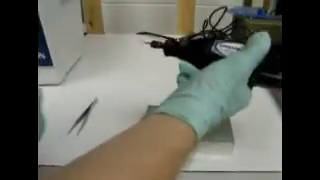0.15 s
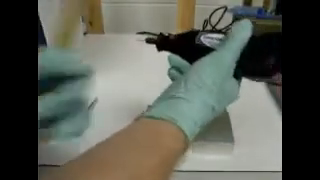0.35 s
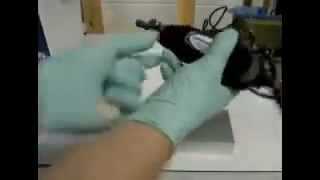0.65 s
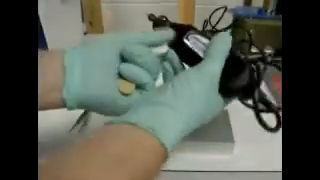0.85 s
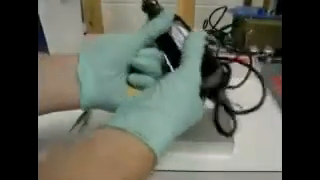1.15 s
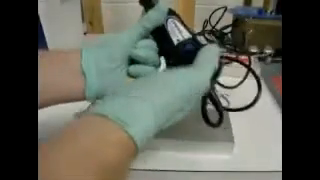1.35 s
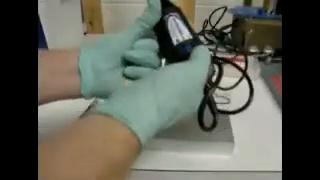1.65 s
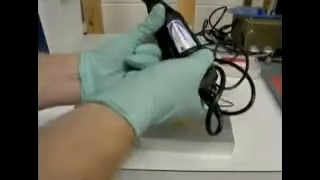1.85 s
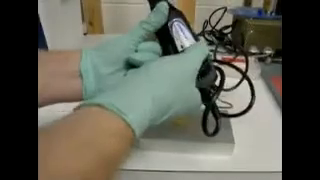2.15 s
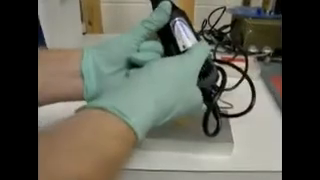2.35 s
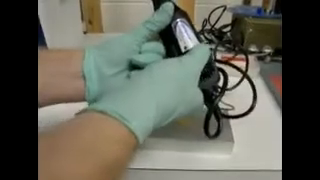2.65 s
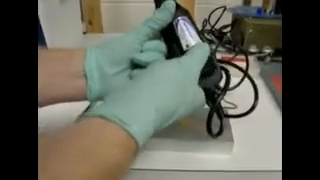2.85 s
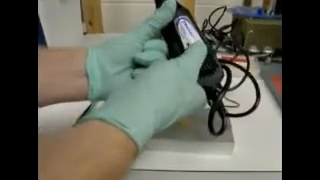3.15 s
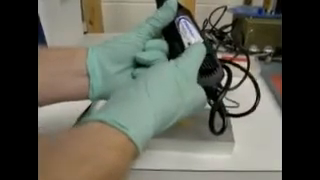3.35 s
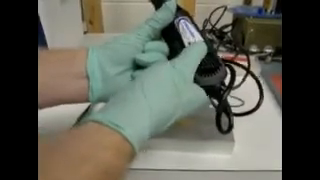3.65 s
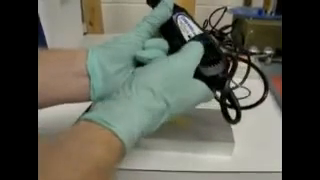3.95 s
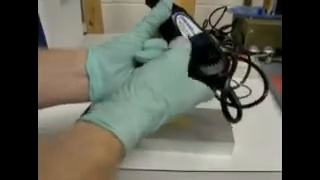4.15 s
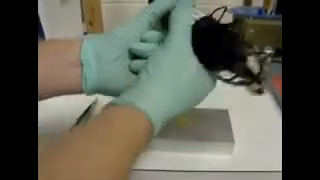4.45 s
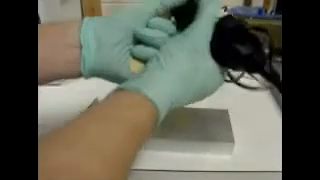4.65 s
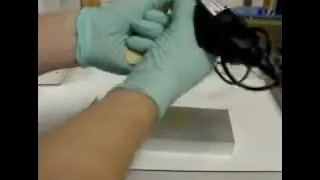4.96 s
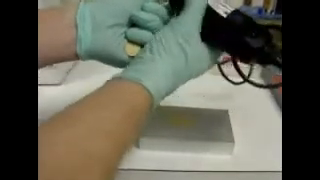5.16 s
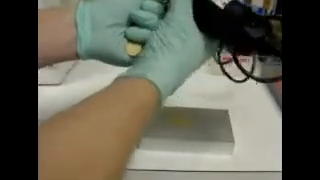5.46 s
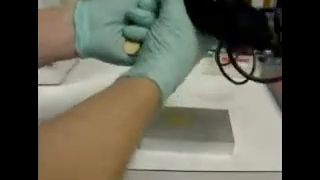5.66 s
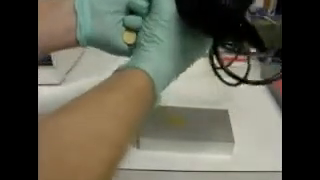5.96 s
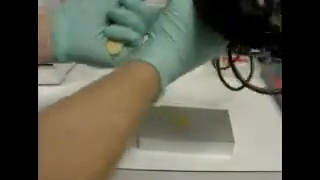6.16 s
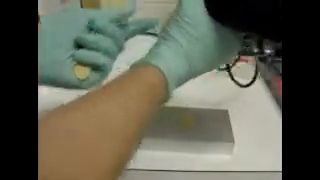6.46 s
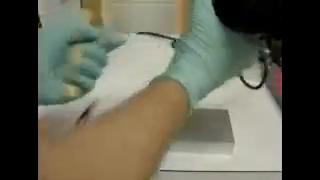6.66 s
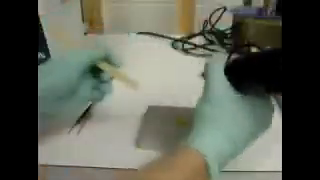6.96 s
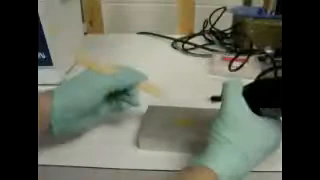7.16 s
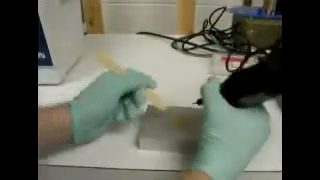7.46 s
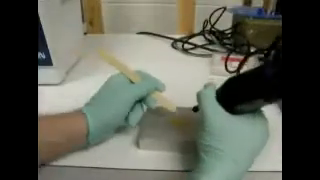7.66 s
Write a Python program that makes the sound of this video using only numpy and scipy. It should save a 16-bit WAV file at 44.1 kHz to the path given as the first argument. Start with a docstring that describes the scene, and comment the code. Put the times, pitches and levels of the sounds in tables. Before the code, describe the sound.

In a lab with low ventilation rumble and electrical hum, rubber gloves rub and click on the plastic body of a small rotary tool. A switch snaps and the motor starts with a low, buzzing growl. It is quickly turned up to a high whine with rushing air and hiss, running freely and shifting slightly in tone as it is handled. The microphone is close.

```python
"""A lab, over ventilation rumble and mains hum. Gloved hands shift their grip on a small rotary tool:
rubber sticks and slips, plastic clicks, and the switch snaps on. The motor growls at low speed,
pulsing with the mains, then is turned up to a high whine of armature slots and fan blades over
rushing air and hissing brushes. A small camera's low sampling rate folds the highest whistle down."""
import sys
import numpy as np
from scipy import signal
from scipy.fft import rfft, irfft, next_fast_len
from scipy.io import wavfile
from scipy.ndimage import uniform_filter1d, map_coordinates

SR = 44100
rng = np.random.default_rng(int(sys.argv[2]) if len(sys.argv) > 2 else 0)


def store_pcm(level_fs):
    """Save levels as 16-bit WAV."""
    pcm = np.round(np.clip(level_fs, -1, 1) * 32767).astype(np.int16)
    wavfile.write(sys.argv[1], SR, np.atleast_2d(pcm).T)


N = 343980
T = np.arange(N) / SR
MAINS_HZ = 60
SWITCH_S, TURN_UP_S = 2.54, 3.0545  # power on; speed control turned up

# running noise as the hands cover and uncover the tool: (time [s], air level [dB], hiss level [dB])
HAND_COVER = [(3.6, -60, -53), (3.67, -58.5, -53.5), (4.11, -56.5, -51.5), (4.46, -51, -48),
              (4.48, -55.5, -51.5), (4.66, -51, -49.5), (4.77, -53.5, -53.5), (4.84, -50, -51.5),
              (4.97, -53.5, -50.5), (5.44, -55, -48), (5.74, -55.5, -51), (5.94, -62.5, -55.5),
              (6.02, -57, -50.5), (6.24, -54, -50), (6.43, -57.5, -54.5), (7.1, -53.5, -49.5),
              (7.31, -56.5, -54.5), (7.53, -50.5, -47.5), (7.63, -55.5, -54), (7.78, -54.5, -50)]
# modes of the plastic shell: (frequency [Hz], width [Hz], level [dB])
SHELL_MODES = [(2528, 323, -1.5), (3460, 147, -2.5), (4640, 410, -4.5), (6270, 270, -4.5)]
# the nose of the tool tips down: (time [s], tilt [0-1])
NOSE_TILT = [(7.25, 0), (7.5, 1)]


def amp(db):
    """Decibels to gain."""
    return 10 ** (np.asarray(db) / 20)


def unit(x):
    """Scale to rms 1."""
    return x / np.sqrt(np.mean(x ** 2) + 1e-20)


def eq(points, hz):
    """Gain of an EQ curve drawn through (frequency [Hz], level [dB]) points on a log axis."""
    freqs, db = np.transpose(points)
    return amp(np.interp(np.log(hz + 1), np.log(freqs + 1), db))


def curves(rows):
    """Automation: one value per sample for each column after the time."""
    times, *columns = np.transpose(rows)
    return [np.interp(T, times, column) for column in columns]


def wobble(rate):
    """A smooth random curve, rate knots a second."""
    return map_coordinates(rng.standard_normal(int(N * rate / SR) + 4), [T * rate])


def filtered(x, response):
    """Pass x through a complex response of frequency."""
    size = next_fast_len(N + 8192)
    return irfft(rfft(x, size) * response(np.fft.rfftfreq(size, 1 / SR)), size)[:N]


def noise(spectrum, patchy_db):
    """Coloured noise of rms 1 with drifting patches of gain."""
    bins = signal.stft(rng.standard_normal(N), nperseg=512)[2]
    patches = uniform_filter1d(rng.standard_normal(bins.shape), size=5, axis=0)
    patches = unit(uniform_filter1d(patches, size=36, axis=1))
    patchy = signal.istft(bins * amp(patchy_db * patches), nperseg=512)[1][:N]
    return unit(filtered(patchy, lambda hz: eq(spectrum, hz)))


def causal(x, spectrum, size=2048):
    """Colour x with a minimum-phase filter of energy 1, keeping attacks sharp."""
    cepstrum = irfft(np.log(eq(spectrum, np.fft.rfftfreq(size, 1 / SR))))
    cepstrum[1:size // 2] *= 2
    cepstrum[size // 2 + 1:] = 0
    response = irfft(np.exp(rfft(cepstrum)))
    return signal.fftconvolve(x, response / np.linalg.norm(response))[:N]


def resonances(modes, hz):
    """Complex response of modes of alternating polarity."""
    return sum((-1) ** k * amp(db) * 1j * hz * width / (centre ** 2 - hz ** 2 + 1j * hz * width)
               for k, (centre, width, db) in enumerate(modes))


def room_tone():
    """Ventilation rumble and mains hum; the bed sinks as the tool comes up to speed."""
    # ventilation colour: (frequency [Hz], level [dB])
    rumble_eq = [(13, -43.5), (22, -0.5), (54, 1), (150, -10), (188, -6), (333, -13.5), (387, -11),
                 (621, -20.5), (837, -15.5), (1050, -21.5), (1190, -23.5), (2000, -24), (2160, -27.5),
                 (5560, -31), (8500, -40.5), (11000, -87.5), (18700, -120)]
    # fader of the bed: (time [s], level [dB])
    fader = [(0, -62.5), (0.5, -65), (3.05, -63.5), (3.4, -71.5), (7.8, -75)]
    rumble = unit(filtered(rng.standard_normal(N), lambda hz: eq(rumble_eq, hz)))
    phase = 2 * np.pi * MAINS_HZ * T
    hum = np.sqrt(2) * (amp(-17) * np.sin(phase) + amp(-10.5) * np.sin(2 * phase))
    return amp(curves(fader)[0]) * (rumble + hum * amp(0.78 * wobble(3.3)))


def gloves():
    """Rubber sticks and slips in tiny grains; each stroke of the grip swells and fades."""
    # slides on the shell: (middle [s], half length [s], rub level [dB], hiss level [dB])
    strokes = [(.245, 0.1, -64, -63.5), (0.404, 0.079, -70, -68.5), (0.496, 0.054, -62.5, -62.5),
               (0.666, 0.093, -70, -66), (0.873, 0.072, -72.5, -67.5), (0.932, 0.029, -61, -64),
               (1.052, 0.13, -67.5, -64.5), (1.315, 0.12, -72.5, -73), (1.592, 0.082, -66.5, -72.5),
               (1.82, 0.071, -74, -73)]
    # broad body of the rub: (frequency [Hz], level [dB])
    rub_eq = [(500, -25), (1500, -12.5), (3000, -8), (4600, -5), (5500, -4.5), (7500, -22)]
    # bright hiss of the slide: (frequency [Hz], level [dB])
    slide_eq = [(3500, -34), (5200, -2.5), (6800, 5.5), (7800, -1), (9000, -20), (12000, -51)]
    rub, hiss = np.zeros(N), np.zeros(N)
    for middle, half, rub_db, hiss_db in strokes:
        swell = np.exp(-((T - middle) / half) ** 2)
        rub = np.hypot(rub, amp(rub_db) * swell)
        hiss = np.hypot(hiss, amp(hiss_db) * swell)
    grain = unit(amp(1.1 * wobble(450) + 1.6 * wobble(49.7)))
    return grain * (rub * noise(rub_eq, patchy_db=1.5) + hiss * noise(slide_eq, patchy_db=1.8))


def clicks():
    """Each click is a sharp snap, a faint knock and a short ring of the struck part of the shell."""
    # grip, switch and speed control: (time [s], level [dB], ring offset [dB], ring pitch [Hz])
    hits = [(0.2205, -33, -26, 2400), (0.2596, -28.5, -17, 2400), (0.262, -32, -18, 2430),
            (0.2649, -30, -1.5, 2400), (0.9338, -50.5, 2, 1630), (1.3494, -46, -10, 2400),
            (2.531, -24.5, -11, 3280), (2.5362, -38, -10, 3360), (3.0763, -28, -19, 3380),
            (5.4467, -29, -24, 2400)]
    # bright plastic snap: (frequency [Hz], level [dB])
    snap_eq = [(500, -30), (2000, -24), (3300, -13), (4300, -13.5), (5400, -8), (6000, -5), (6900, -2),
               (8000, -18), (10000, -6.5)]
    # midrange knock: (frequency [Hz], level [dB])
    knock_eq = [(100, -18), (600, -25), (1200, -2.5), (1800, -3), (3000, -11), (6000, -13)]
    snaps, rings = np.zeros(N), np.zeros(N)
    t = np.arange(SR // 10) / SR
    attack = 1 - np.exp(-t / 0.00032)
    strike = attack * (amp(-60 * t / 0.0061) + amp(-23) * amp(-60 * t / 0.069))
    ring = attack * amp(-60 * t / 0.008)
    for time, db, ring_db, hz in hits:
        start = round(time * SR)
        snaps[start:start + len(t)] += amp(db + 6) * strike * rng.standard_normal(len(t))
        rings[start:start + len(t)] += amp(db + ring_db + 3) * ring * np.sin(2 * np.pi * hz * t)
    low_cut = signal.butter(2, 1500, 'highpass', fs=SR, output='sos')
    return causal(snaps, snap_eq) + amp(-23) * causal(snaps, knock_eq) + signal.sosfilt(low_cut, rings)


def walls(x, t60):
    """The short diffuse answer of bench and walls."""
    t = np.arange(SR // 3) / SR
    tail = rng.standard_normal(len(t)) * amp(-60 * t / t60) * (t > .003)
    return signal.fftconvolve(x, tail / np.linalg.norm(tail))[:N]


def shaft_speed():
    """Turns a second: a slow start, a leap when turned up, then a steady creep upward."""
    # the shaft closes in on each new speed: (start [s], speed gained [Hz], time constant [s])
    spin_up = [(SWITCH_S, 202.3, .323), (TURN_UP_S, 139.3, .101), (TURN_UP_S, 181.7, .504)]
    creep_hz_per_s = 8.33
    steps = sum(gain * (1 - np.exp(-np.maximum(T - start, 0) / tau)) for start, gain, tau in spin_up)
    return steps + creep_hz_per_s * np.maximum(T - TURN_UP_S, 0)


def slow_db(speed, per_decade, cruise_hz=446):
    """Level lost below cruising speed (0 dB or less)."""
    return per_decade * np.log10(np.clip((speed + 1) / cruise_hz, None, 1))


def shake_db(speed, lift, critical_hz=390, width_hz=35.4):
    """Level gained near the critical speed, where the whole tool shakes."""
    return lift * np.exp(-((speed - critical_hz) / width_hz) ** 2)


def strain(speed):
    """Follows the power that accelerates the rotor, 0-1."""
    power = np.abs(speed * np.gradient(speed))
    return (power / power.max()) ** 0.98


def mains(speed):
    """Depth and phase [rad] of the current's pulsing: it smooths out and lags as speed gathers."""
    depth = np.interp(speed, [150, 420, 560], [.9, .8, .45])
    lag_cycles = np.interp(speed, [160, 420], [-.06, .24])
    return depth, 2 * np.pi * (2 * MAINS_HZ * T - lag_cycles)


def surge(depth, phase):
    """Current swells on each half wave of the mains; rms 1."""
    return np.exp(depth * np.cos(phase)) / np.sqrt(np.i0(2 * depth))


def shell(hz):
    """Complex response of the plastic shell."""
    return resonances(SHELL_MODES, hz)


def rotor(speed):
    """Return an oscillator locked to the shaft; at low speed torque pulses jerk it and smear its tones."""
    _, phase = mains(speed)
    effort = strain(speed)
    jerk = .055 * np.sin(phase) + .02 * wobble(260)
    angle = 2 * np.pi * np.cumsum(speed * (1 + 0.000452 * wobble(14))) / SR
    angle += jerk * np.interp(speed, [155, 250, 400, 500], [0.3, 0.44, 0.23, 0.052])

    def tone(order, rough, drift_db=1):
        """One multiple of the shaft speed; phase flutter and level drift grow under strain."""
        flutter = (rough + .45 * effort) * wobble(130)
        drift = amp(drift_db * wobble(5) + 1.6 * np.sqrt(effort) * wobble(45))
        return np.sqrt(2) * drift * np.sin(order * angle + flutter + rng.uniform(0, 2 * np.pi))
    return tone


def slot_whine(speed, tone, level_db):
    """Eight armature slots tug at the field, harder while the rotor accelerates, and ring the shell."""
    cutoff_hz, leak_db = 1900, -16.5  # the small shell radiates lows poorly; some octave bypasses it
    effort = strain(speed)
    depth, phase = mains(speed)
    current = surge(depth, phase)
    radiated = 1 / (1 + (cutoff_hz / (8 * speed + 1)) ** 10)
    tug = amp(-35.5) * effort * np.abs(shell(8 * speed)) * radiated
    # under load the alternating field splits the tone into a beating pair, which merges at speed
    split = np.interp(speed, [488, 492], [1, 0])
    field = np.sqrt(2 * split) * np.cos(phase / 2) + np.sqrt(1 - split) * current
    whine = np.hypot(tug, amp(level_db)) * field * tone(order=8, rough=0.14, drift_db=0.9)
    octave_gain = amp(-37.5) * effort * np.hypot(np.abs(shell(16 * speed)), amp(leak_db))
    return whine + octave_gain * current * tone(order=16, rough=0.33, drift_db=-0.5)


def growl(speed, tone):
    """Slot overtones of the labouring motor sweep through the shell's modes; some bypass the shell."""
    # fader of the growl: (time [s], level [dB])
    fader = [(2.55, -90), (2.68, -66), (2.78, -58), (3.045, -56), (3.06, -49), (3.15, -55), (3.22, -75),
             (3.3, -120)]
    current = surge(*mains(speed))
    overtones = sum(tone(order=k, rough=.45) for k in range(16, 49, 8))
    # the brightest stays in the treble: the 32nd order hands over to the 24th
    handover = np.clip((speed - 160) / 30, 0, 1)
    direct = amp(-11) * (1 - handover) * tone(order=32, rough=.8)
    direct += amp(-2) * handover * tone(order=24, rough=.4)
    direct += amp(-22.5) * (overtones + sum(tone(order=k, rough=.5) for k in (12, 18, 26)))
    return amp(curves(fader)[0]) * (filtered(overtones * current, shell) + current * direct)


def whistle(speed, tone):
    """The 18th shaft order flares as it glides through two resonances."""
    # treble resonances: (frequency [Hz], width [Hz], level [dB])
    peaks = [(6340, 200, -43), (7580, 470, -43)]
    depth, phase = mains(speed)
    floor = amp(-56.5 + slow_db(speed, per_decade=23))
    gain = np.hypot(np.abs(resonances(peaks, 18 * speed)), floor)
    return gain * tone(order=18, rough=.2, drift_db=-1.5) * surge(0.067 * depth, phase)


def motor_tones(speed):
    """All that is locked to the shaft: slots, growl, whistle, unbalance, fan blades and faint orders."""
    # balance as the tool is turned in the hands:
    # (time [s], unbalance [dB], fan against the air [dB], slots [dB], fan overtone [dB])
    balance = [(3.6, -73, -1.5, -63, -85), (4.27, -69.5, 3.5, -57, -65.5), (5.05, -83, 3.5, -57.5, -77.5),
               (5.4, -87, 4.5, -49.5, -78), (5.95, -91, 0.5, -59, -69), (6.25, -74.5, 4.5, -57, -65),
               (6.5, -75, -1, -59.5, -64), (6.75, -74, -0.5, -61, -57), (7.0, -72, -0.5, -58, -59),
               (7.27, -71, -9.5, -62.5, -58), (7.5, -65.5, -4.5, -60, -59), (7.7, -69.5, -8, -71, -63)]
    # faint tones that emerge near full speed: (order [x shaft speed], level against the air [dB])
    faint_orders = [(2, -22), (6, -16.5), (10, -14.5), (12, -12), (14, -14)]
    unbalance_db, fan_db, slots_db, overtone_db = curves(balance)
    air_db = curves(HAND_COVER)[0] + shake_db(speed, lift=7.5)
    speed_db = slow_db(speed, per_decade=54)
    tone = rotor(speed)
    whine = slot_whine(speed, tone, slots_db + speed_db) + growl(speed, tone) + whistle(speed, tone)
    shaft = amp(unbalance_db - 2.5 + shake_db(speed, lift=16)) * tone(order=1, rough=0.15, drift_db=0.5)
    fan = amp(air_db + fan_db - 2) * tone(order=3, rough=0.16, drift_db=0.9)
    fan += amp(overtone_db - 1.5) * tone(order=9, rough=0.24, drift_db=-0.8)
    faint = sum(amp(db) * tone(order=k, rough=0.2, drift_db=2.5) for k, db in faint_orders)
    faint *= amp(air_db - 0.5 - 6 * curves(NOSE_TILT)[0]) * np.clip((speed - 470) / 55, 0, 1)
    return whine + amp(speed_db) * (shaft + fan) + faint


def fan_air(speed):
    """Air through the vents grows with speed and softens as the nose tips down."""
    # midrange of the vents: (frequency [Hz], level [dB])
    vents_eq = [(100, -60.5), (300, -21.5), (720, -15), (1050, -4), (1350, -5), (1700, 1), (2000, -4),
                (2400, -9.5), (3500, -44)]
    # brighter rush of air: (frequency [Hz], level [dB])
    rush_eq = [(1500, -28), (2300, -3), (2900, -0.5), (3700, -4), (4800, -2), (5600, -4.5), (7000, -36)]
    level_db = curves(HAND_COVER)[0] + slow_db(speed, per_decade=10) + shake_db(speed, lift=7.5)
    tilt, = curves(NOSE_TILT)
    depth, phase = mains(speed)
    vents = amp(0.5 - 5.5 * tilt) * noise(vents_eq, patchy_db=1.83)
    rush = amp(-0.5 - 5 * tilt) * noise(rush_eq, patchy_db=1.0) * surge(0.029 * depth, phase)
    return amp(level_db) * (vents + rush)


def brush_hiss(speed):
    """The brushes spark unevenly, in time with the mains at low speed; tilting changes their colour."""
    # hiss before the tilt: (frequency [Hz], level [dB])
    raised_eq = [(3800, -33.5), (5100, -8.5), (5800, -4.5), (6550, 0.5), (7300, -4), (8000, -7),
                 (9000, -12), (12000, -46.5)]
    # hiss with the nose down: (frequency [Hz], level [dB])
    lowered_eq = [(1900, -22.5), (2250, -3), (2550, -8), (3000, -12), (3350, -9.5), (3900, -14.5),
                  (5050, 0.5), (5600, -2.5), (6100, -5), (6800, 1.5), (7250, 4), (8000, -5.5), (9000, -9),
                  (12000, -45)]
    level_db = curves(HAND_COVER)[1] + 1 + slow_db(speed, per_decade=18) + shake_db(speed, lift=6)
    tilt, = curves(NOSE_TILT)
    _, phase = mains(speed)
    sparking = surge(np.interp(speed, [160, 450], [.6, .05]), phase) * amp(0.64 * wobble(350))
    hiss = np.sqrt(1 - tilt) * noise(raised_eq, patchy_db=2.0)
    hiss += np.sqrt(tilt) * noise(lowered_eq, patchy_db=-0.5)
    return amp(level_db) * hiss * sparking


def brush_rattle(speed):
    """The brushes shake the shell in pulses a tenth of a cycle ahead of the current's."""
    # fader of the rattle: (time [s], level [dB])
    fader = [(2.55, -63), (2.62, -59), (2.7, -64), (2.78, -54.5), (3.04, -50), (3.2, -54), (3.6, -71.5),
             (7.4, -69), (7.52, -52), (7.8, -49)]
    _, phase = mains(speed)
    depth = np.interp(speed, [160, 500], [1.5, .1])
    pulses = rng.standard_normal(N) * surge(depth, phase + 2 * np.pi * .1)
    return amp(curves(fader)[0] - 2.5) * unit(filtered(pulses, shell))


def motor():
    """The tool runs from the moment the switch closes."""
    speed = shaft_speed()
    fade_in = np.clip((T - SWITCH_S) / 0.13, 0, 1)
    return fade_in * (motor_tones(speed) + fan_air(speed) + brush_hiss(speed) + brush_rattle(speed))


def scene():
    """The tool and the hands close by, the room behind them."""
    near = motor() + clicks() + gloves()
    return (near + amp(-17) * walls(near, t60=.25) + room_tone())[None]


def record(dry):
    """The camera's soft input filter lets treble mirror about half its sampling rate."""
    sampling_hz, band_limit_hz = 16000, 8900
    # roll-offs before and after the fold: (frequency [Hz], level [dB])
    input_eq = [(7400, 0), (8000, 0), (8700, -4.5), (9500, -22.5), (11000, -81.5)]
    output_eq = [(7500, 0), (8000, -4.5), (8400, -10.5), (8900, -31.5)]
    softened = filtered(dry[0], lambda hz: eq(input_eq, hz))
    folded = softened * (1 + 2 * np.cos(2 * np.pi * sampling_hz * T))
    return filtered(folded, lambda hz: eq(output_eq, hz) * (hz < band_limit_hz))[None]


dry = scene()
out = record(dry)
store_pcm(out)
```